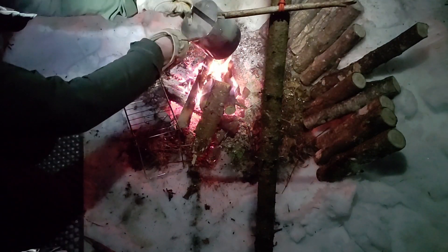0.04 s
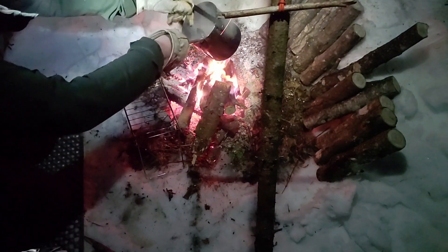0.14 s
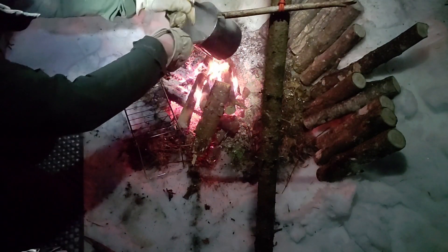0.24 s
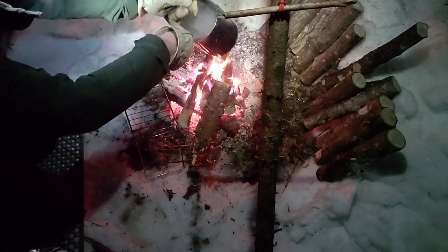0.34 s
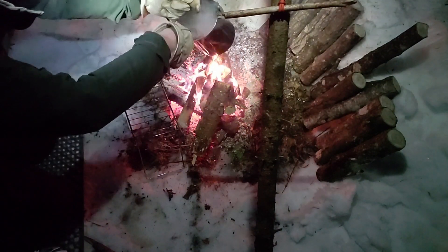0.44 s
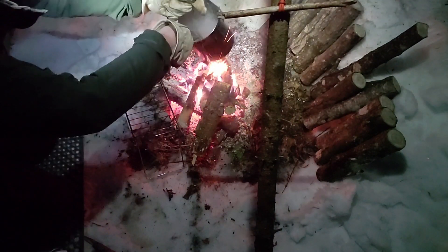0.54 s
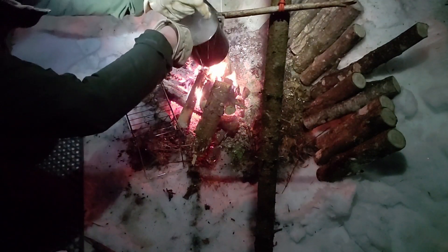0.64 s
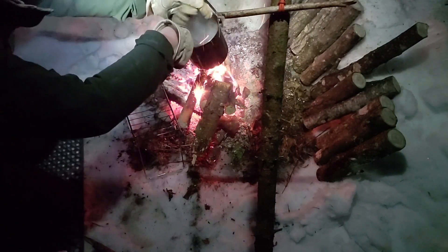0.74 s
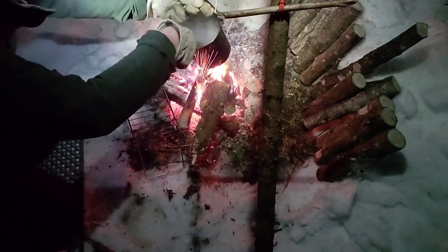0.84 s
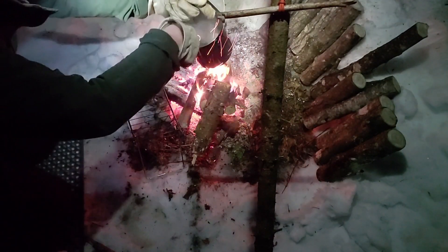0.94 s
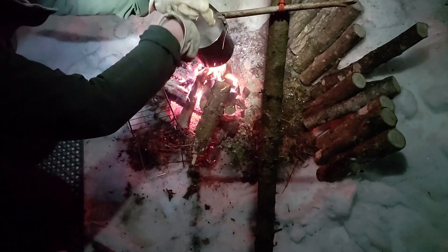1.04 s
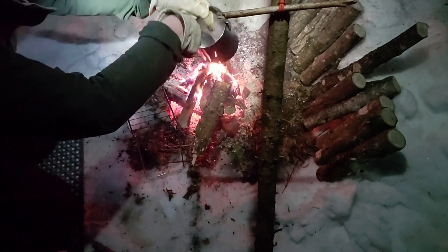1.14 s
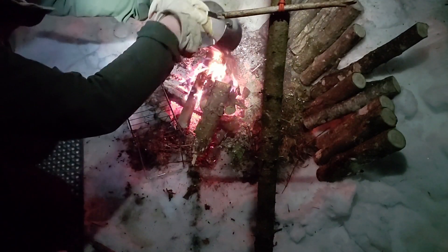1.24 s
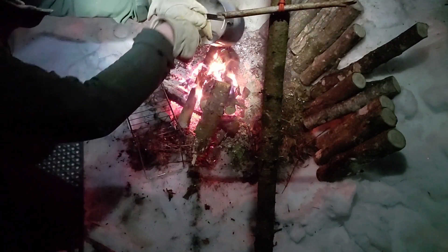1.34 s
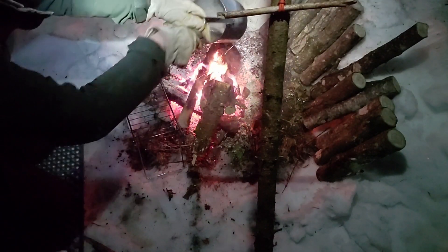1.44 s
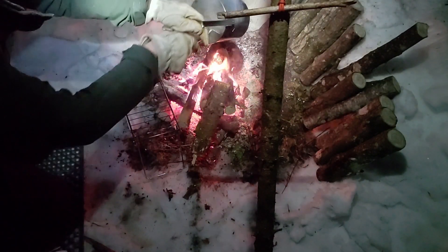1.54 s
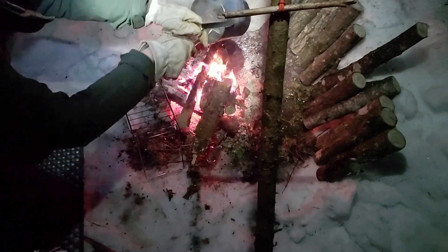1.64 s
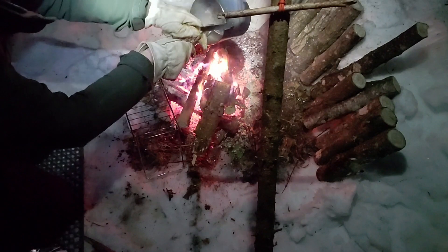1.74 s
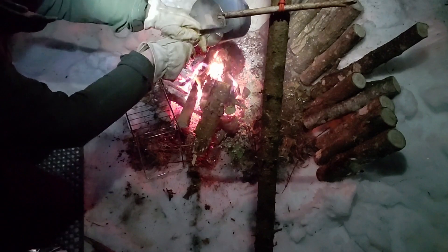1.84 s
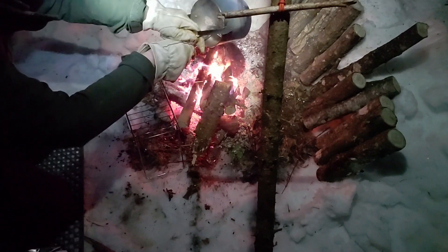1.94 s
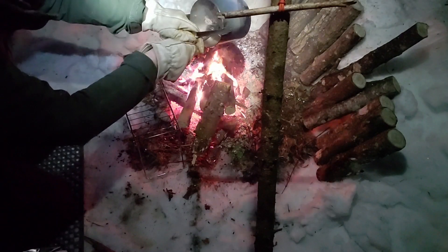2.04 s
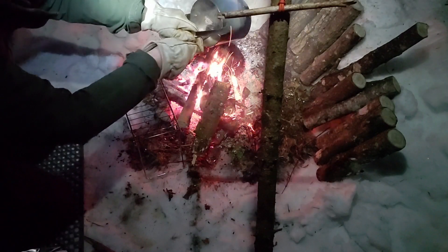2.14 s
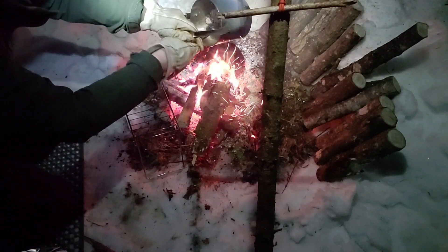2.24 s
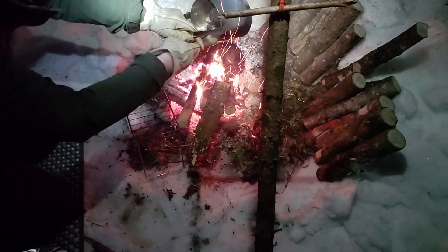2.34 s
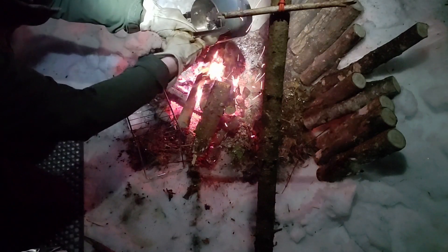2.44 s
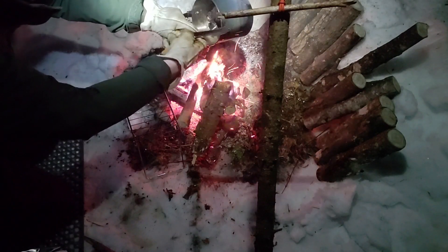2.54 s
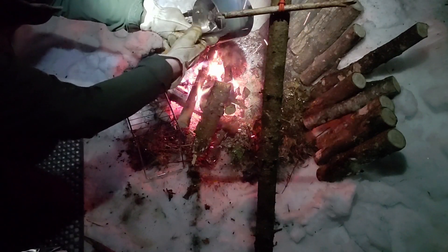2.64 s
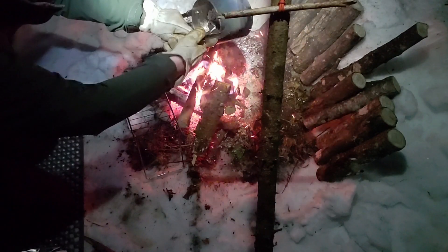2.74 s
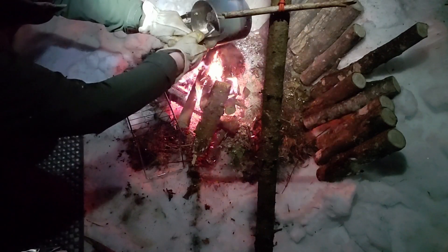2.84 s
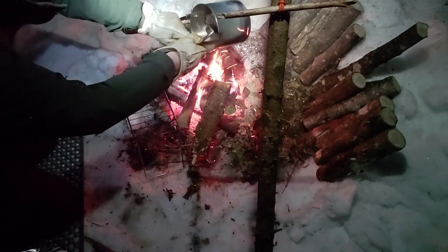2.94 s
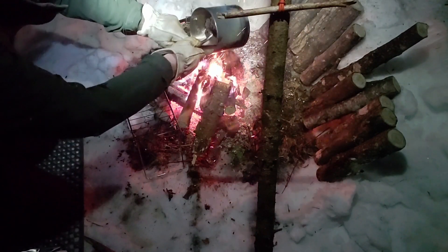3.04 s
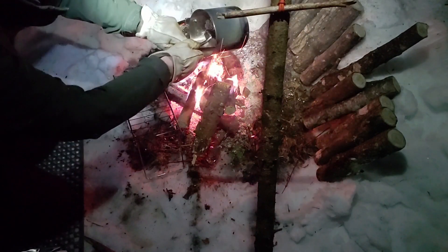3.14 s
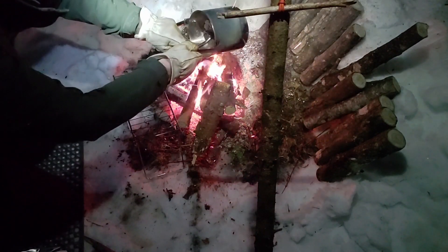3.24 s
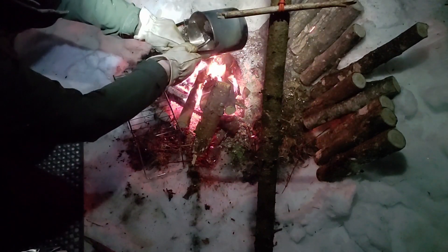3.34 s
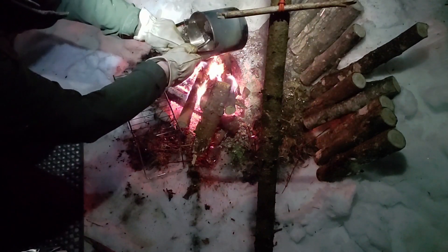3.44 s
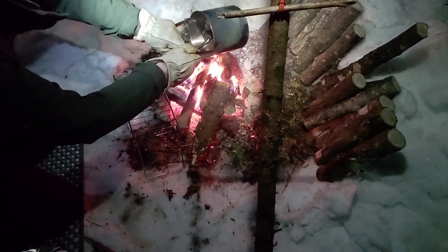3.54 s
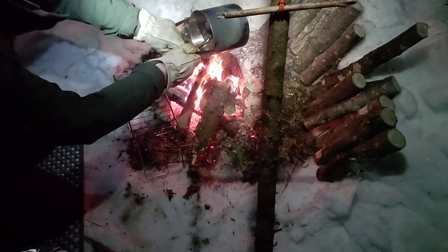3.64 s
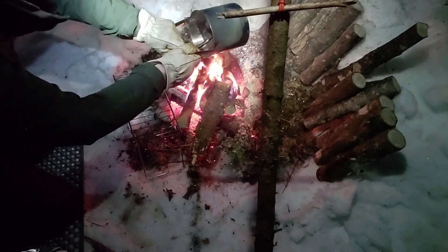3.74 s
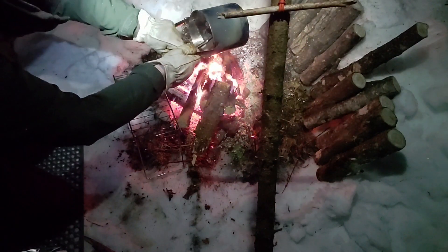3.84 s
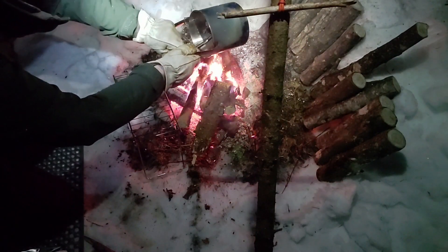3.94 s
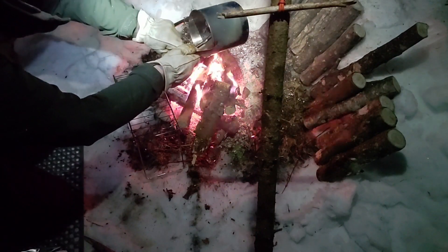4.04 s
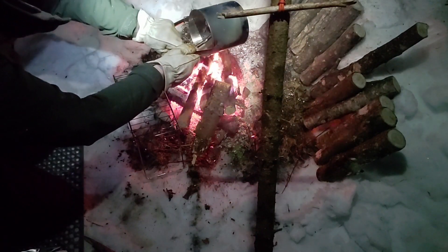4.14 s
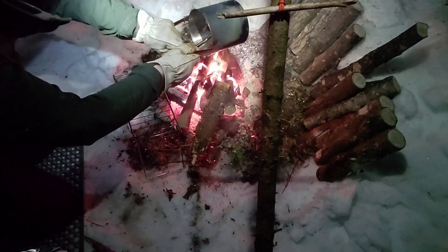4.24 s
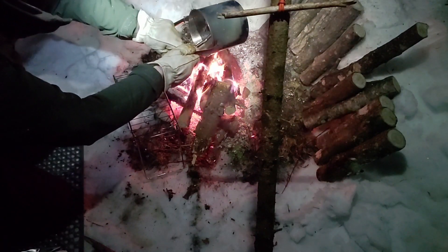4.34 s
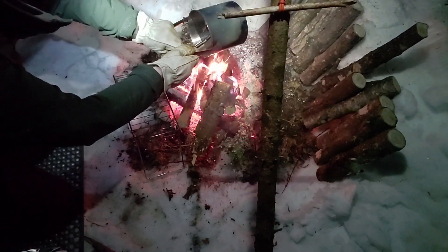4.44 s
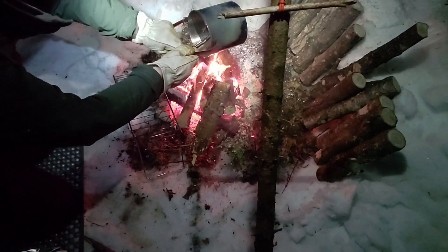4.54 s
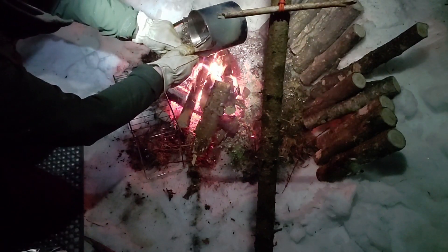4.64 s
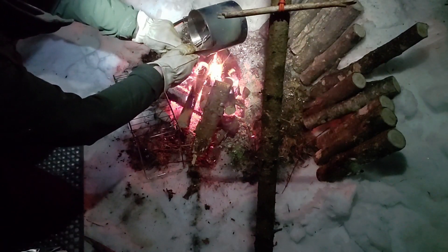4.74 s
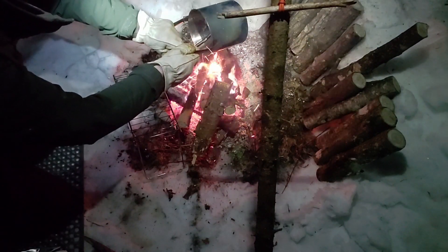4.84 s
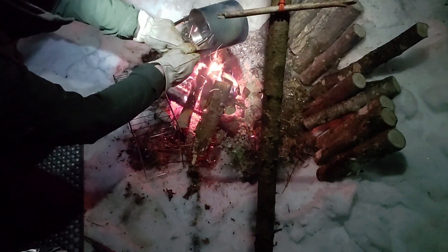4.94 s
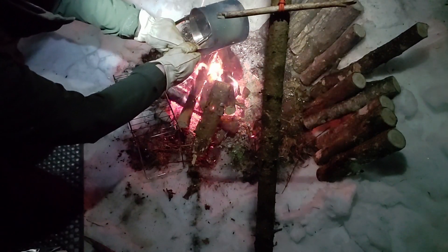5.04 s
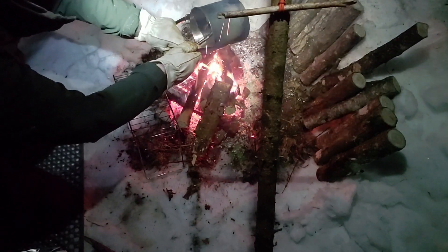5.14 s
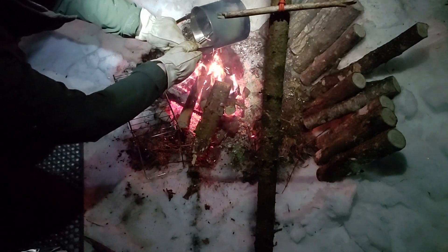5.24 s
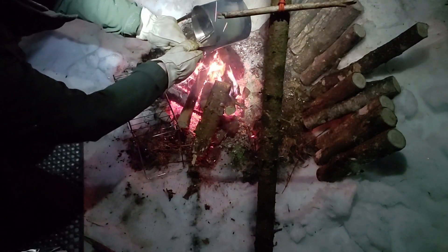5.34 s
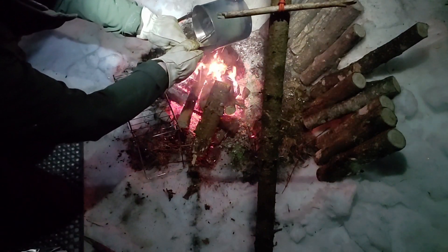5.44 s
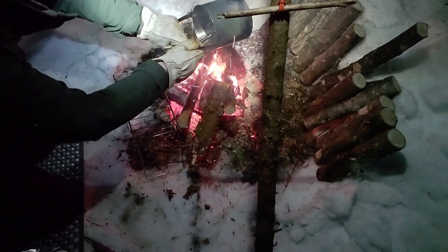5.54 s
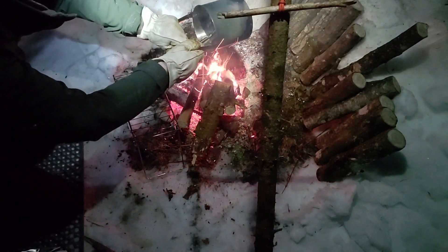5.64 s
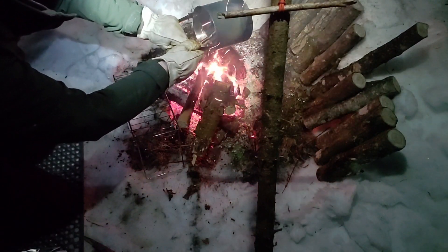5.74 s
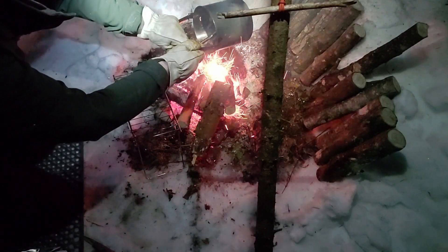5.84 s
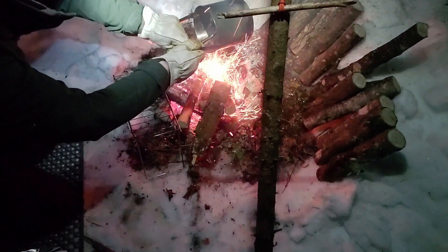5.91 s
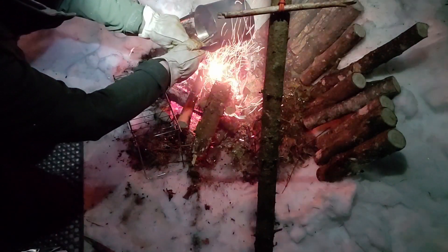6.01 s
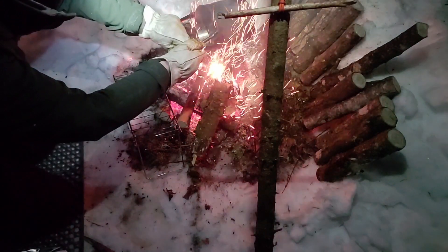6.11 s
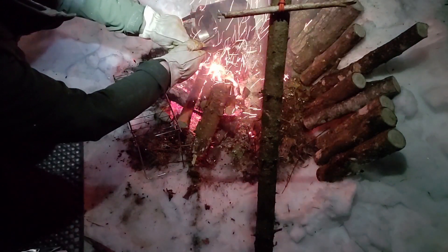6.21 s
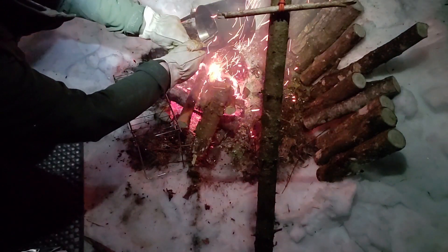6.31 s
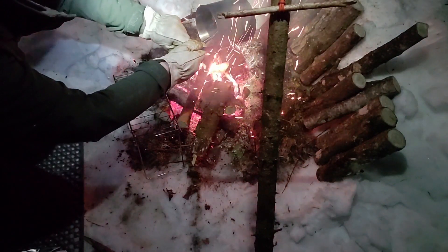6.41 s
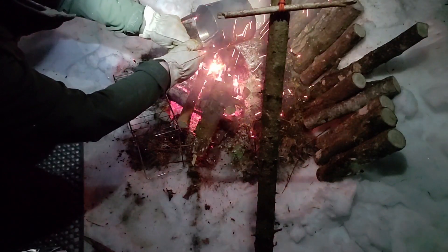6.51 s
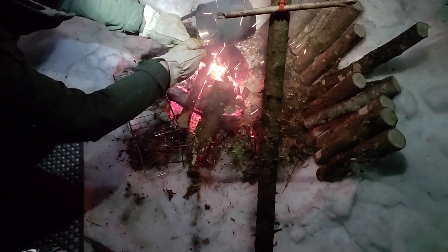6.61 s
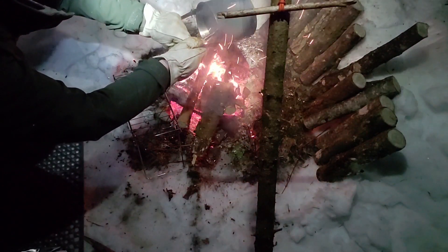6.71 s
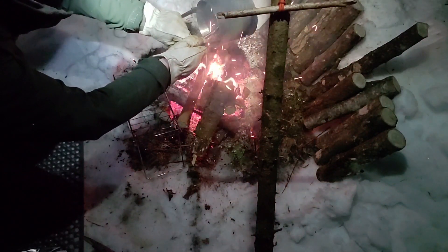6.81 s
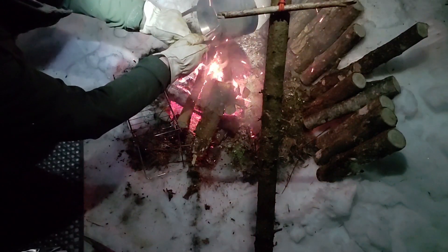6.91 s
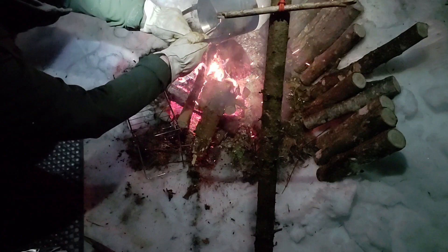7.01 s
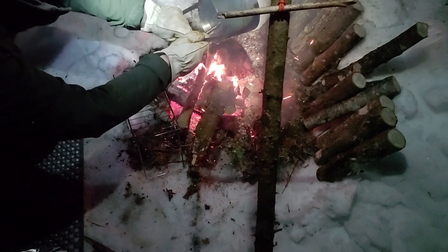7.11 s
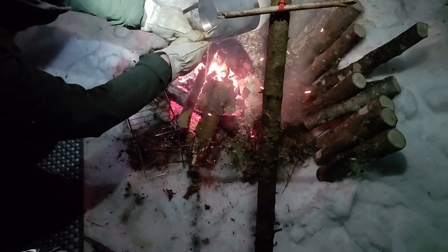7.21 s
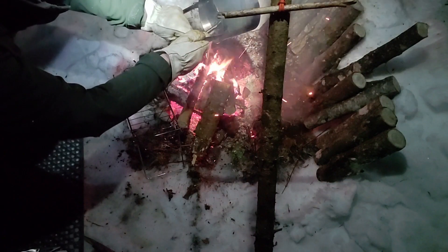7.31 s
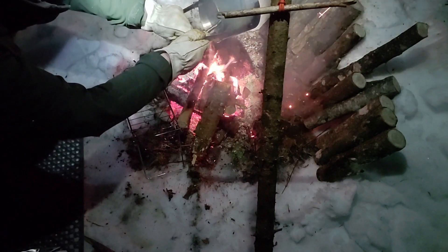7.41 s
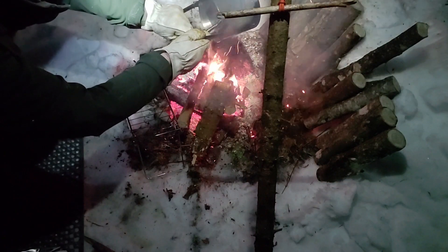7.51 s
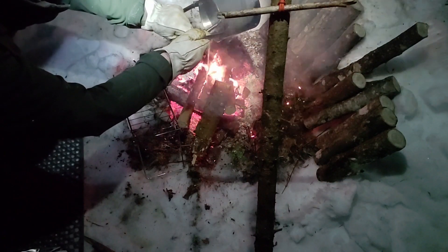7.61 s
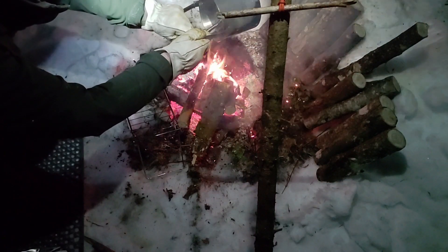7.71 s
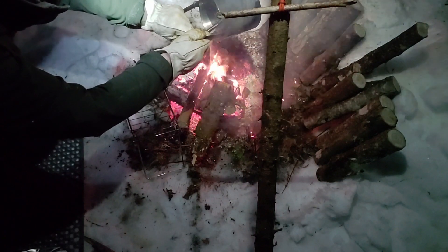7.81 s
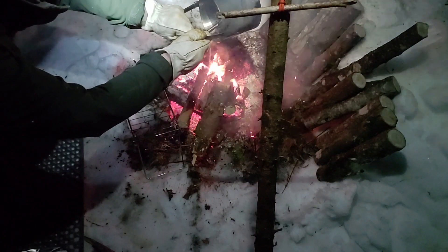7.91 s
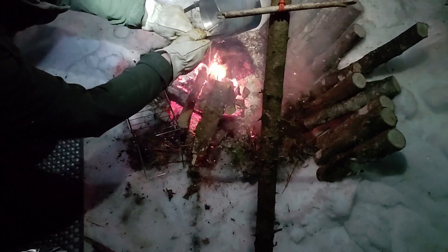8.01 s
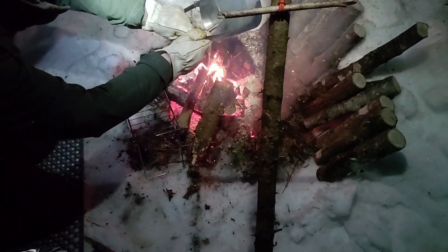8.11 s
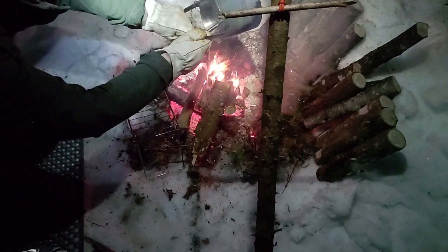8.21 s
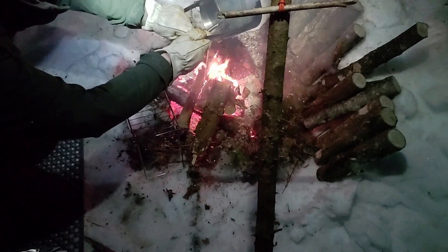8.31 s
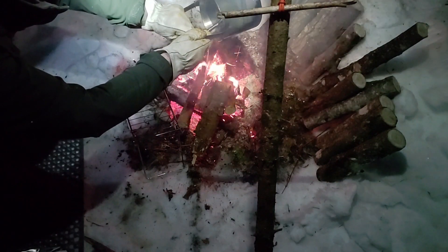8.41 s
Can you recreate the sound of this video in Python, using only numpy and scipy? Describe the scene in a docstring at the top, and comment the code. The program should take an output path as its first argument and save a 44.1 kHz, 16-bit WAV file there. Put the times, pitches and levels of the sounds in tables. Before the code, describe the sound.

Outdoors, heard close in stereo: four seconds of sparse fire pops, ember fizz, stiff cloth brushing, soft snow creaks and two dull metallic pot knocks. Grease poured on the fire erupts into a wide frying hiss full of crackles. A log splits with a hard, brittle crack and short scattered echo, the sizzle fades almost away, and a second smaller, sputtering swell ends with crisp pops. Snow keeps the space dry.

```python
"""Hot grease tipped from a pot onto a snowy campfire flashes into a dense sizzle that sinks, swells and spits.
Boiling is banded noise under random droplet bursts; pops and spits are short noise cracks with scatter.
A log cracks hard: damped modes and tearing noise, then an echo and a scattered tail.
Behind it flames rumble as fluttering low noise, embers fizz, the pot knocks on damped modes,
and packed snow and cloth move as random slips and rustling noise. All is heard a metre or two away in a wood."""
import sys
import numpy as np
from scipy import signal
from scipy.fft import rfft, irfft
from scipy.io import wavfile
from scipy.ndimage import uniform_filter1d

SR = 44100
rng = np.random.default_rng(int(sys.argv[2]) if len(sys.argv) > 2 else 0)


def to_wav(sig):
    """Store sig (one row per channel, or 1-D mono) as 16-bit WAV at the path in sys.argv[1].

    Samples outside -1..1 are clipped; the rate is SR.
    """
    pcm = np.clip(np.atleast_2d(sig), -1, 1) * 32767
    pcm = np.round(pcm).astype(np.int16)
    wavfile.write(sys.argv[1], SR, pcm.T)  # frames by channels


N = 373082
TIME = np.arange(N) / SR

# how hard the grease boils: first drops, full pour, lull, second swell: time_s, boil_db
BOIL = [(4.12, -60.5), (4.42, -63), (4.47, -35.5), (4.72, -32.5), (4.97, -39), (5.62, -38.5), (5.78, -46),
        (6.38, -54.5), (6.42, -50.5), (6.78, -58.5), (7.12, -48.5), (7.22, -52.0), (7.78, -42.5),
        (7.88, -49), (8.03, -42.5), (8.22, -45), (8.28, -42.5), (8.45, -48.5)]
# low boiling, sizzle and fine spray: level_db at full boil, slope (dB gained per dB of boil)
BOIL_BANDS = [(-49.5, 1.1), (-37, 1.04), (-33, 0.96)]
# spectrum of the boiling grease: frequency_hz, level_db
SIZZLE_SPECTRUM = [(88, -45.5), (150, -10), (334, -12.5), (504, -16.5), (854, -9.5), (1020, -18.5),
                   (1170, -12.5), (1420, -14.5), (1900, -12), (4410, -5), (6770, -6), (7920, -14),
                   (9080, -17.5), (15100, -3.5), (16000, -9.5)]
# loudest pops of the logs and spits of grease: start_s, body_db, crack_db, treble_db, left_minus_right_db
LOUD_POPS = [(0.0586, -54, -40, -38.5, 2), (0.3469, -37, -25.5, -29.5, 2.5), (0.4306, -56, -34, -37, -2),
             (0.6615, -68, -42, -42, 2), (0.7605, -29.5, -19.5, -28, 1.5), (1.16, -46, -32, -27, 3),
             (1.6546, -60, -42.5, -44, 0), (1.955, -48.5, -38, -38.5, 0.5), (2.0792, -26.5, -18, -19.5, 3),
             (2.1273, -33.5, -27.5, -26, 3), (2.159, -42.5, -38, -40, -1), (2.2427, -51.5, -41.5, -47, -2),
             (2.5563, -41, -41, -43.5, -2), (2.623, -41.5, -35.5, -40.5, 1.5), (2.8914, -40, -28, -26, 4.5),
             (2.9282, -37.5, -36, -40, 0), (2.9698, -45.5, -44, -52, 0), (2.9937, -40, -32.5, -39, 2.5),
             (3.0106, -41, -37.5, -35.5, 1), (3.074, -52.5, -46, -48, 1), (3.869, -59, -51, -46.5, -1),
             (4.7242, -41.5, -31, -26, -2.5), (4.754, -38, -27, -27, 5), (4.7635, -56, -27.5, -38, -1),
             (5.1813, -35, -29.5, -29, 2), (5.462, -47, -39, -27.5, 4), (5.5182, -35, -25.5, -22.5, 1.5),
             (5.7993, -30, -21, -17.5, 1), (6.6663, -74, -51.5, -39.5, -1), (7.1529, -52, -39, -33.5, -1.5),
             (7.265, -50.5, -40.5, -38.5, 3), (7.3693, -44, -33, -47, 4), (7.4277, -50, -32.5, -27.5, 3.5),
             (7.6822, -70, -60, -30, -2), (7.7893, -57, -38, -36, 6), (7.8213, -68, -52, -39, 2),
             (7.8564, -55, -43, -26, -1), (7.9564, -50, -30.5, -27, 3), (8.0025, -46, -34.5, -29, 4),
             (8.0918, -40.5, -34.5, -27, 2), (8.26, -43, -21.5, -23.5, 4), (8.307, -36, -26.5, -27.5, 4),
             (8.363, -37, -27, -26, 3)]
# spectrum of a pop: frequency_hz, level_db
POP_SPECTRUM = [(50, -16), (300, 3), (700, -5), (1100, 1.5), (1700, 1.5), (2800, -1.5), (4300, -0.5),
                (5500, -2), (6600, 2.5), (8300, -5.5), (11000, -1.5), (15500, -3)]
# quick runs of small ticks from the wood: start_s, length_s, level_db, brightness_db
TICK_RUNS = [(0.585, 0.105, -47.5, -4.5), (1.676, 0.04, -49, -1.5), (1.816, 0.12, -41.5, -0.5),
             (2.451, 0.07, -46.5, 1.5)]
# moments when a log splits: start_s, level_db
LOG_SPLITS = [(5.7596, -3)]
# modes of the split log: frequency_hz, level_db, t60_s
LOG_MODES = [(1980, -9, 0.0083), (2570, -15.5, 0.017), (2724, 2, 0.0075), (3250, -10, 0.0054),
             (4264, -3, 0.0072), (4990, -8, 0.0073), (6240, -6, 0.0065)]
# spectrum of the tearing fibres: frequency_hz, level_db
TEAR_SPECTRUM = [(40, -22.5), (120, -1), (300, 4), (700, -5), (1100, 3.5), (1500, -9), (2000, -2),
                 (3000, 9), (5000, -9), (6800, -1), (8300, -27.5), (11500, -18), (15500, -11.5)]
# spectrum of what the woodpile sends back: frequency_hz, level_db
PILE_SPECTRUM = [(100, -16), (400, -12.5), (1500, -10.5), (2100, 1), (3000, 1), (4500, 2), (6500, -1),
                 (8300, -22), (12000, -10), (15500, -20)]
# damp wood fizzing in the fire: time_s, level_db
EMBER_LEVEL = [(0, -53), (0.4, -56), (1.45, -51.5), (2.0, -59.5), (2.9, -53.5), (3.15, -59), (4.1, -59.5),
               (4.5, -57)]
# spectrum of the fizz: frequency_hz, level_db
EMBER_SPECTRUM = [(120, -8), (250, -6.5), (450, -8.5), (900, -16.5), (1800, -22.5), (3000, -17.5),
                  (6600, -8.5), (8100, -25), (11000, -15.5), (15500, -4.5)]
# slow rise and fall of the flames: time_s, level_db
FLAME_LEVEL = [(0, -63.5), (1.95, -63.5), (2.15, -60), (3.05, -59), (3.6, -68.5), (4.3, -63), (4.47, -54.5),
               (5.5, -56.5), (6.1, -62.5), (6.75, -74), (8.45, -59.5)]
# spectrum of the flames: frequency_hz, level_db
FLAME_SPECTRUM = [(20, -21), (40, -11), (64, -2.5), (85, -4), (130, -12), (250, -20.5), (500, -39),
                  (1200, -48.5)]
# dull knocks of the pot being handled: start_s, peak_db
POT_KNOCKS = [(0.929, -28), (1.278, -29.5), (2.421, -50)]
# modes of the pot: frequency_hz, level_db, t60_s
POT_MODES = [(412, 10.5, 0.14), (540, 11.5, 0.043), (1290, -31, .05), (1570, -7, 0.19), (1830, -32, .04),
             (2090, -5, 0.11), (2380, 5, 0.13), (3000, 12, 0.024)]
# packed snow creaking under a shifting knee: peak_s, rise_s, fall_s, level_db
SNOW_CREAKS = [(0.52, 0.11, 0.1, -50.5), (0.94, 0.02, 0.23, -60.5), (1.39, 0.12, 0.21, -48.5),
               (2.425, 0.016, 0.27, -59.5)]
# hollows in the packed snow: frequency_hz, level_db, t60_s
SNOW_MODES = [(345, -8.5, 0.037), (489, 1, 0.023), (598, -8, 0.049), (808, -6, 0.022), (1227, -10, 0.041),
              (1600, -9, 0.029)]
# a stiff sleeve brushing the jacket: peak_s, rise_s, fall_s, level_db
SLEEVE_BRUSHES = [(0.29, 0.08, 0.13, -53), (0.57, 0.37, 0.26, -49.5), (0.96, 0.034, 0.24, -56),
                  (1.38, 0.088, 0.39, -50), (2.61, 0.16, 0.074, -54.5)]
# spectrum of brushed cloth and scuffs: frequency_hz, level_db
SLEEVE_SPECTRUM = [(200, -2.5), (700, -4), (1500, 0.5), (2300, -5), (3000, 0), (4600, -0.5), (6000, -5.5),
                   (8000, -11.5), (15000, -9)]
# spectrum of the tail among the tree trunks: frequency_hz, level_db
WOOD_SPECTRUM = [(100, -28), (400, -7), (1500, 1), (3000, 3), (6000, -14), (9000, -9.5), (15000, -20.5)]
# part that differs between the two microphone ports, against the common part: frequency_hz, level_db
PORT_SPREAD = [(60, -20), (300, -18), (1000, -9), (2500, -5), (4500, -3), (8000, -1), (15000, -1)]
# right port's colour against the left: frequency_hz, level_db
PORT_DIFFERENCE = [(100, 4.5), (500, 3), (1100, 2), (2700, 2), (4400, -2.5), (6600, 6), (8700, -5.5),
                   (11000, 4.5), (14000, 2)]
# low, middle and treble bands: low_hz, high_hz
BANDS = [(100, 2200), (2200, 8500), (8500, 17000)]
BAND_FILTERS = [signal.butter(6, edges, "band", fs=SR, output="sos") for edges in BANDS]

POUR_S = 4.11  # the first grease reaches the embers
FULL_BOIL_DB = -34
# from this moment the thin puddle spits harder and steams less
THIN_AT_S, THIN_SPIT_DB, THIN_STEAM_DB = 6.2, 4, -1
RUSH_S = 0.32  # decay of the rush of boiling when a split stirs the embers
THUMP_DB, THUMP_S = -44.5, 0.041  # thump of flame at a split, and its decay
FLUTTER_PER_S, SLIPS_PER_S = 13, 170
TICKS_PER_S, SPITS_PER_S, RUN_GAP_S = 3.5, 12, .022
# mean lone tick, and mean spit counted from the boil; VARY_DB spreads strength and brightness
TICK_DB, TICK_BRIGHT_DB, SPIT_OVER_DB, SPIT_BRIGHT_DB, VARY_DB = -60, 10, 0.5, 5, 3
# small pop at zero brightness, against its crack; brightness lifts the treble and thins the body
SMALL_BODY_DB, SMALL_TREBLE_DB = -9, -3
SWELL_RANGE_DB = 20  # drop over one rise or fall time
TOP_HZ = 15900


def sizzle():
    """Explosive boiling: droplets burst on the embers over a steam jet; a thin puddle lets single spits stand out."""
    poured = np.interp(TIME, [POUR_S, POUR_S + 0.038], [0, 1])
    thinned = np.where(TIME > THIN_AT_S, 1.0, 0.0)
    levels = [undb(db + slope * (curve(BOIL) - FULL_BOIL_DB)) for db, slope in BOIL_BANDS]
    for index, rush_db in enumerate([-55.5, -45.5]):  # low boiling and sizzle only
        levels[index] = np.hypot(levels[index], undb(rush_db) * after_split(RUSH_S))
    droplets = bursts(rate=2200, scatter_db=3.4, decay_s=.0003, cap_db=17)
    wide_spits = bursts(rate=110, scatter_db=4.5, decay_s=.0005, cap_db=14)
    sputter = undb(.9 * walk(70) + 1.0 * walk(25))
    sound = 0
    for index, spit_db in enumerate([-9, -7, -6]):
        # small spits sound in one band only, and are the briefest
        small_spits = bursts(rate=260, scatter_db=4.5, decay_s=.0002, cap_db=16)
        spits = np.hypot(wide_spits, small_spits) * undb(spit_db + 2 * thinned)
        steam_and_droplets = (droplets ** 2 + 1) / 2
        envelope = sputter * np.sqrt(steam_and_droplets + spits ** 2)
        part = band(colour(ports(envelope), SIZZLE_SPECTRUM), index)
        sound = sound + unit(part) * levels[index]
    return poured * undb(THIN_STEAM_DB * thinned) * sound


def pop(levels_db, scatter_db, rise_s=0.00059, falls_s=(.0013, .0008, .0006),
        scatter_s=0.032, scatter_tilt_db=(1, 0, 2)):
    """Pressure release: a steam pocket tears open in about a millisecond, treble dying first; logs scatter it."""
    t = np.arange(SR // 14) / SR
    noise = colour(ports(np.ones(len(t))), POP_SPECTRUM)
    attack = np.minimum(t / rise_s, 1)
    sound = 0
    for db, fall_s, tilt_db, edges in zip(levels_db, falls_s, scatter_tilt_db, BANDS):
        part = signal.sosfilt(signal.butter(2, edges, "band", fs=SR, output="sos"), noise)
        crack = part * attack * np.exp(-np.maximum(t - 2 * rise_s, 0) / fall_s)
        crack = crack / np.std(crack[:, t < .003])
        scatter = unit(part) * np.exp(-t / scatter_s) * np.minimum(t / 0.00052, 1)
        sound = sound + undb(db) * (crack + undb(scatter_db + tilt_db) * scatter)
    return sound


def small_pops(pan_db=1, pan_spread_db=3):
    """Random point process: rows like LOUD_POPS for lone ticks, runs of ticks, and spits that grow with the boil."""
    ticks = [(s, TICK_DB, TICK_BRIGHT_DB) for s in moments(0, POUR_S, TICKS_PER_S)]
    runs = [(s, db, bright_db) for start_s, length_s, db, bright_db in TICK_RUNS
            for s in moments(start_s, start_s + length_s, 1 / RUN_GAP_S)]
    spit_db = curve(BOIL) + SPIT_OVER_DB + np.where(TIME > THIN_AT_S, THIN_SPIT_DB, 0)
    spits = [(s, spit_db[int(s * SR)], SPIT_BRIGHT_DB) for s in moments(POUR_S, TIME[-1], SPITS_PER_S)]
    rows = []
    for s, db, bright_db in ticks + runs + spits:
        strength, tilt, side = rng.standard_normal(3)
        crack_db = db + VARY_DB * strength
        tilt_db = bright_db + VARY_DB * tilt
        body_db = crack_db + SMALL_BODY_DB - tilt_db
        treble_db = crack_db + SMALL_TREBLE_DB + tilt_db
        rows.append((s, body_db, crack_db, treble_db, pan_db + pan_spread_db * side))
    return rows


def pops(log_scatter_db=-17, spit_scatter_db=-26):
    """Multiple scattering: pops deep between the logs scatter more than spits of grease on top of them."""
    out = np.zeros((2, N))
    for s, body_db, crack_db, treble_db, pan_db in list(LOUD_POPS) + small_pops():
        scatter_db = log_scatter_db if s < POUR_S else spit_scatter_db
        sound = pop([body_db, crack_db, treble_db], scatter_db)
        add(out, s, sound * undb(np.array([[pan_db], [-pan_db]]) / 2))
    return out


def split(ring_db=-2, tear_db=-5, pile_db=-21, pile_s=0.018, echo_s=0.012, echo_db=-11):
    """Fracture excites modes: tearing fibres ring the log, the ground echoes, the pile scatters (direct, scattered)."""
    direct, scattered = np.zeros((2, 2, N))
    t = np.arange(SR // 5) / SR
    first = t < .003
    for s, db in LOG_SPLITS:
        tone = ring(LOG_MODES, t) * np.minimum(t / 0.0014, 1)  # the ring builds as the tear runs
        tear = colour(ports(t * np.exp(-t / 0.00065)), TEAR_SPECTRUM)
        tone_part = undb(ring_db) * tone / np.std(tone[first])
        tear_part = undb(tear_db) * tear / np.std(tear[:, first])
        crack = tone_part + tear_part
        pile = colour(ports(np.minimum(t / 0.0057, 1) * np.exp(-t / pile_s)), PILE_SPECTRUM)
        add(direct, s, undb(db) * crack)
        add(direct, s + echo_s, undb(db + echo_db) * band(crack, 1) * np.exp(-t / 0.0039))
        add(scattered, s, undb(db + pile_db) * pile / np.std(pile[:, t < .02]))
    return direct, scattered


def after_split(decay_s):
    """Impulsive excitation: an envelope that jumps up when a log splits, then decays exponentially."""
    return sum((TIME > s) * np.exp(-np.abs(TIME - s) / decay_s) for s, _ in LOG_SPLITS)


def pot():
    """Damped modal response: a short scuffing blow rings the pot, damped by the glove."""
    out, t = np.zeros((2, N)), np.arange(SR // 5) / SR
    for s, peak_db in POT_KNOCKS:
        blow = ports(np.exp(-t / 0.0084))
        ringing = unit(signal.fftconvolve(blow, ring(POT_MODES, t)[None])[:, :len(t)])
        scuff = unit(colour(blow, SLEEVE_SPECTRUM))
        sound = ringing + undb(7.5) * scuff
        add(out, s, sound / np.abs(sound).max() * undb(peak_db))
    return out


def crunch():
    """Stick-slip: packed snow gives way in dull, hollow slips while cloth brushes on cloth."""
    t, snow = np.arange(SR // 20) / SR, 0
    for hz, db, t60 in SNOW_MODES:
        slips = (rng.random(N) < SLIPS_PER_S / SR) * rng.standard_normal(N)
        snow = snow + undb(db) * unit(signal.oaconvolve(slips, ring([(hz, 0, t60)], t))[:N])
    weave = bursts(rate=690, scatter_db=-0.5, decay_s=0.0013, cap_db=14)
    cloth = unit(colour(ports(weave), SLEEVE_SPECTRUM))
    return unit(snow) * swells(SNOW_CREAKS) + cloth * swells(SLEEVE_BRUSHES)


def embers():
    """Gas escape: sap fizzes finely out of the burning wood, with faint ticks over a steady hiss."""
    fizz = np.hypot(bursts(rate=250, scatter_db=4, decay_s=.0004, cap_db=16), undb(7))
    return unit(colour(ports(fizz), EMBER_SPECTRUM)) * undb(curve(EMBER_LEVEL))


def flames(flutter_db=3):
    """Combustion noise: burning gas flutters in a low rumble, and thumps when a log splits."""
    flutter = undb(curve(FLAME_LEVEL) + flutter_db * walk(FLUTTER_PER_S))
    level = flutter + undb(THUMP_DB) * after_split(THUMP_S)
    return unit(colour(ports(np.ones(N)), FLAME_SPECTRUM)) * level


def ground(x, echo_s=0.0089, echo_db=-15):
    """Specular reflection: one early, thinner echo off the frozen ground."""
    late = np.pad(x, ((0, 0), (int(echo_s * SR), 0)))[:, :N]
    return undb(echo_db) * colour(late, [(800, -4), (2500, 2), (6500, -0.5), (11000, 0.0)])


def trees(x, wet_db, t60=.5):
    """Diffuse reverberation: tree trunks send back a thin, dull tail; the snow swallows the rest."""
    t = np.arange(SR) / SR
    decay = np.exp(-np.log(1000) * t / t60) * np.minimum(t / 0.0027, 1)
    tail = colour(rng.standard_normal((2, SR)) * decay, WOOD_SPECTRUM)
    tail = tail / np.sqrt(np.sum(tail[0] ** 2))
    return signal.fftconvolve(x, undb(wet_db) * tail, axes=1)[:, :N]


def undb(db):
    """Logarithmic level: decibels become an amplitude ratio."""
    return 10 ** (np.asarray(db) / 20)


def unit(x):
    """Effective value: scale a signal to an RMS of one."""
    return x / np.sqrt(np.mean(x ** 2))


def curve(rows, column=1):
    """Linear interpolation: a table's column joined by straight lines in time."""
    rows = np.array(rows)
    return np.interp(TIME, rows[:, 0], rows[:, column])


def colour(x, points):
    """Minimum-phase filtering: a causal response with the given (Hz, dB) points, by folding the cepstrum."""
    hz, db = np.transpose(points)
    size = 2048
    grid = np.maximum(np.fft.rfftfreq(size, 1 / SR), 1)
    cepstrum = irfft(np.log(undb(np.interp(np.log(grid), np.log(hz), db))))
    cepstrum[1:size // 2] *= 2
    cepstrum[size // 2 + 1:] = 0
    response = irfft(np.exp(rfft(cepstrum)))
    kernel = response.reshape((1,) * (x.ndim - 1) + (-1,))
    return signal.oaconvolve(x, kernel, axes=-1)[..., :x.shape[-1]]


def band(x, index):
    """Band-pass filtering: the low (0), middle (1) or treble (2) part of a sound."""
    return signal.sosfilt(BAND_FILTERS[index], x)


def ports(envelope):
    """Spatial coherence: noise under an envelope, alike at both ports in the bass but not in the treble."""
    mid, side = rng.standard_normal((2, len(envelope))) * envelope
    side = colour(side, PORT_SPREAD)
    return np.array([mid + side, mid - side])


def walk(rate):
    """Low-passed random levels: each held 1 / rate s and smoothed twice, with an RMS of one."""
    hold = max(int(SR / rate), 1)
    steps = np.repeat(rng.standard_normal(N // hold + 1), hold)
    return unit(uniform_filter1d(uniform_filter1d(steps, hold), hold)[:N])


def bursts(rate, scatter_db, decay_s, cap_db):
    """Shot noise: tiny decaying bursts at random moments, their sizes spread exponentially in dB."""
    size = undb(np.minimum(scatter_db * rng.exponential(size=N), cap_db))
    energy = (rng.random(N) < rate / SR) * size ** 2
    decayed = signal.lfilter([1], [1, -np.exp(-1 / (decay_s * SR))], energy)
    return unit(np.sqrt(decayed + 1e-12))


def ring(modes, t):
    """Modal superposition: damped sine modes set off together."""
    return sum(undb(db) * np.sin(2 * np.pi * hz * t) * np.exp(-np.log(1000) * t / t60)
               for hz, db, t60 in modes)


def swells(rows):
    """Exponential growth and decay: movements build to a peak and die away, evenly in dB."""
    return sum(undb(db - SWELL_RANGE_DB * np.maximum((s - TIME) / rise_s, (TIME - s) / fall_s))
               for s, rise_s, fall_s, db in rows)


def moments(start_s, end_s, rate):
    """Jittered point process: irregular times at a mean rate, one somewhere in each slot."""
    slots = np.arange(start_s, end_s - 1 / rate / 2, 1 / rate)
    return np.minimum(slots + rng.random(len(slots)) / rate, end_s)


def add(out, start_s, sound):
    """Linear superposition: mix a short sound in at a moment."""
    i = max(int(start_s * SR), 0)
    out[:, i:i + sound.shape[1]] += sound[:, :N - i]


def scene():
    """Direct and reflected sound: sharp sounds echo among the trees; the rest stays close to the fire."""
    close = sizzle() + embers() + crunch() + flames()
    crack, scattered = split()
    split_log = crack + scattered + trees(scattered, wet_db=-12.0)
    sharp = pot() + pops()
    return close + split_log + sharp + ground(sharp) + trees(sharp, wet_db=-19.5)


def record(dry):
    """Transduction: each port has its own colour, peaks beyond full scale clip, and the top is cut."""
    left, right = (colour(x, [(hz, sign * db / 2) for hz, db in PORT_DIFFERENCE])
                   for x, sign in zip(dry, (-1, 1)))
    late_left = np.roll(left, 1)  # the fire lies a little to the right
    heard = np.clip([late_left, right], -1, 1)
    return signal.sosfilt(signal.ellip(10, .2, 70, TOP_HZ, fs=SR, output="sos"), heard)


dry = scene()
out = record(dry)
to_wav(out)
```